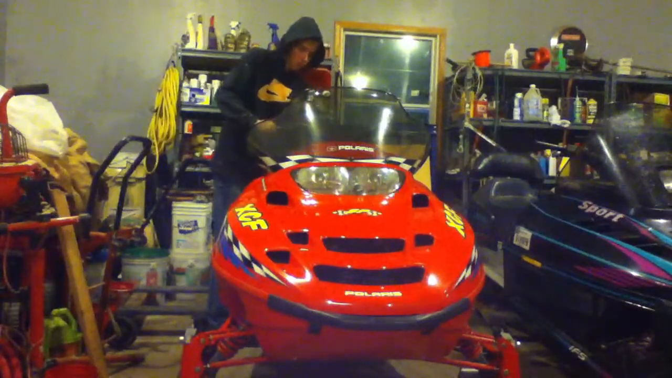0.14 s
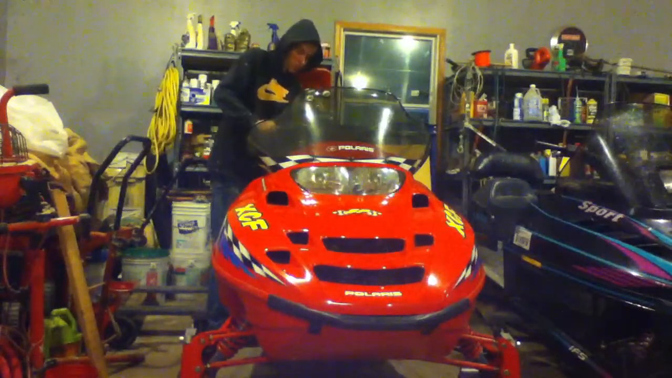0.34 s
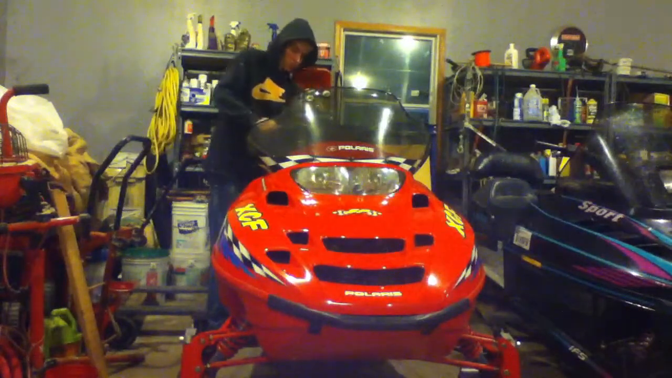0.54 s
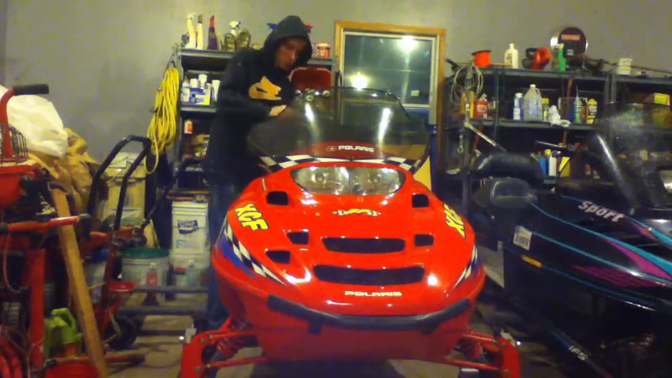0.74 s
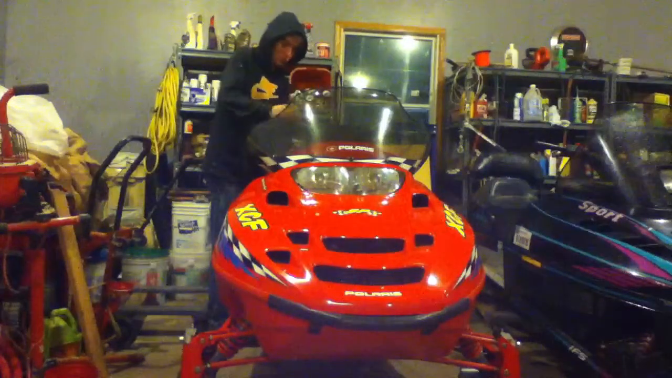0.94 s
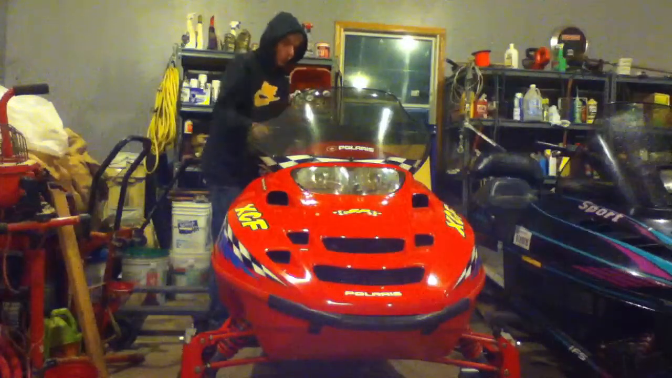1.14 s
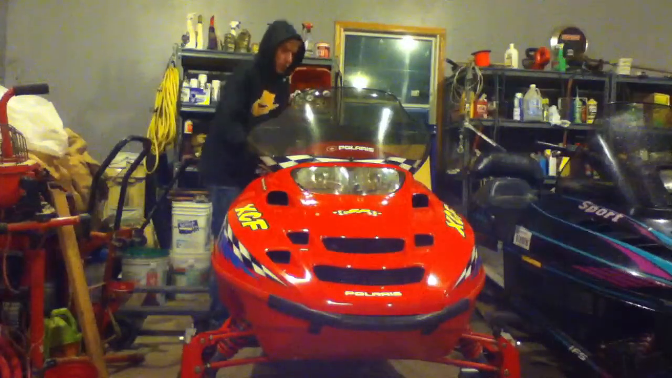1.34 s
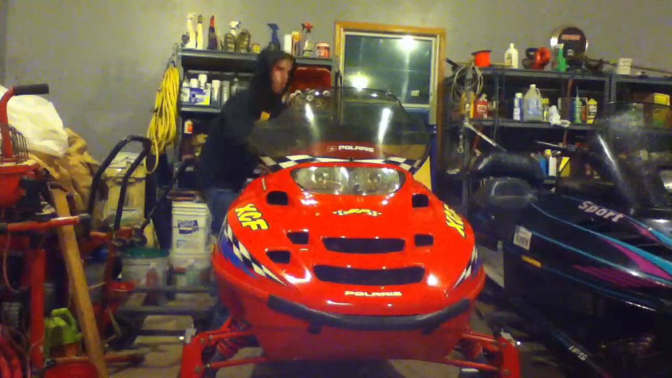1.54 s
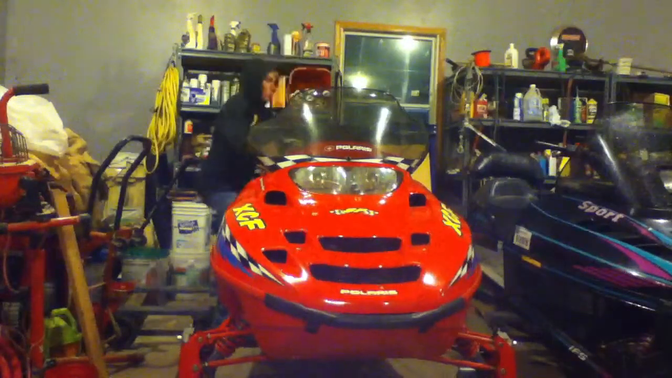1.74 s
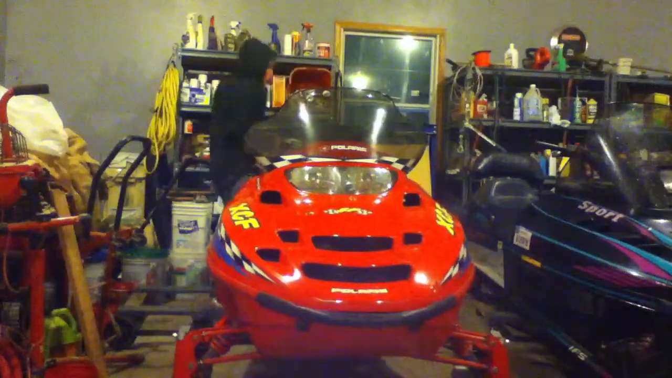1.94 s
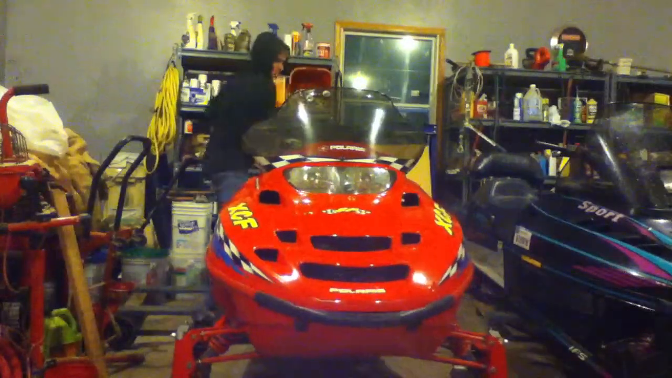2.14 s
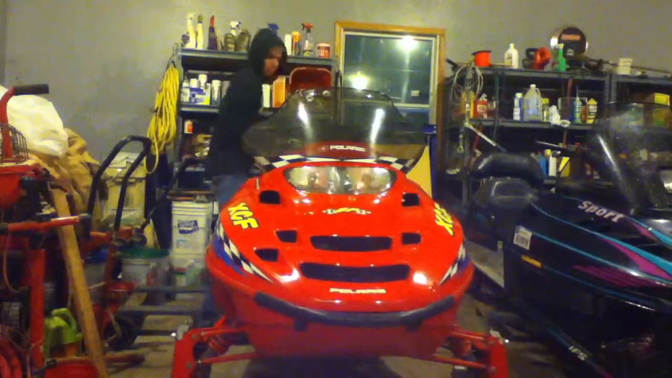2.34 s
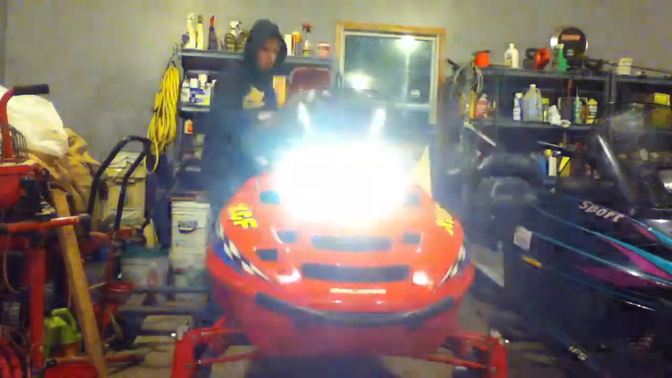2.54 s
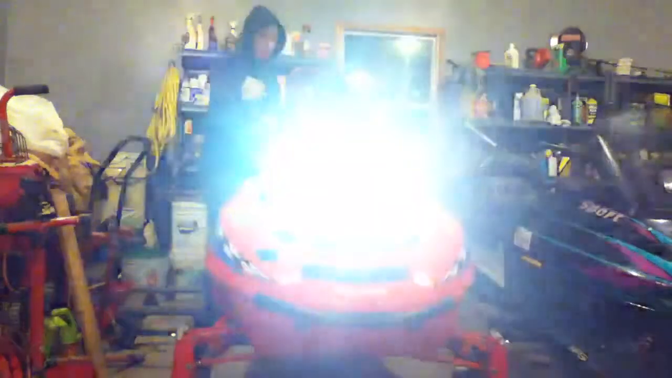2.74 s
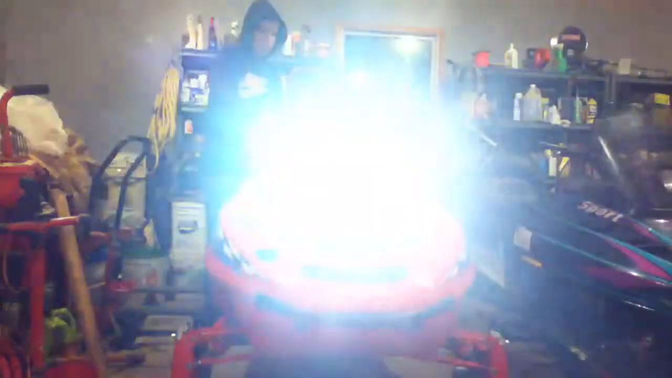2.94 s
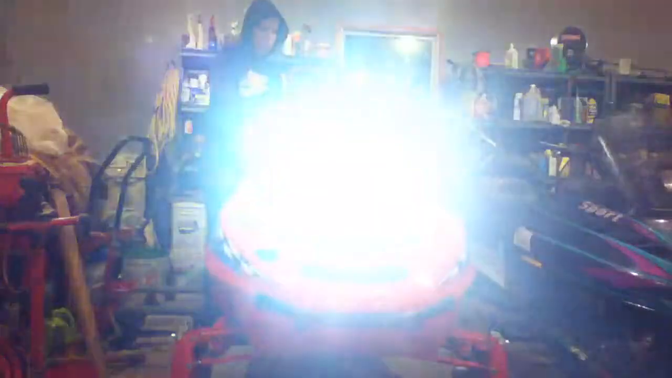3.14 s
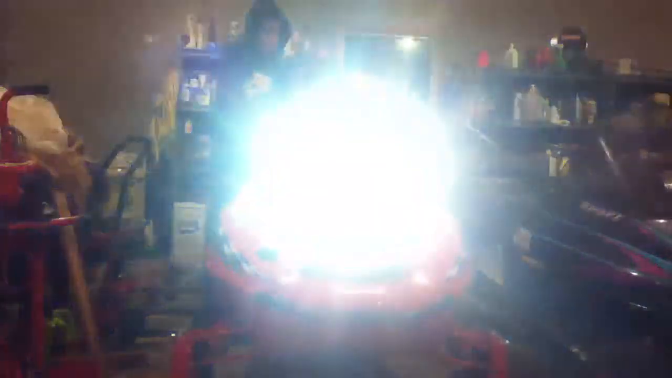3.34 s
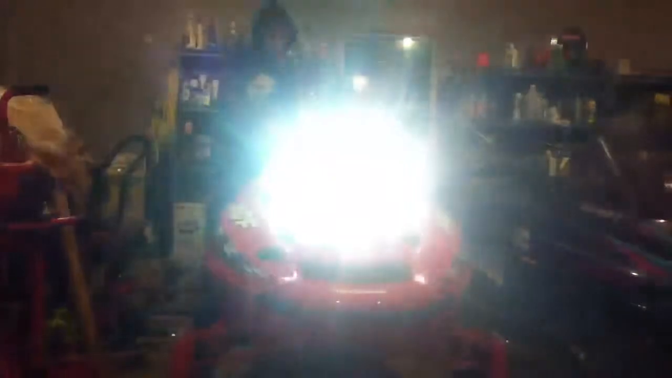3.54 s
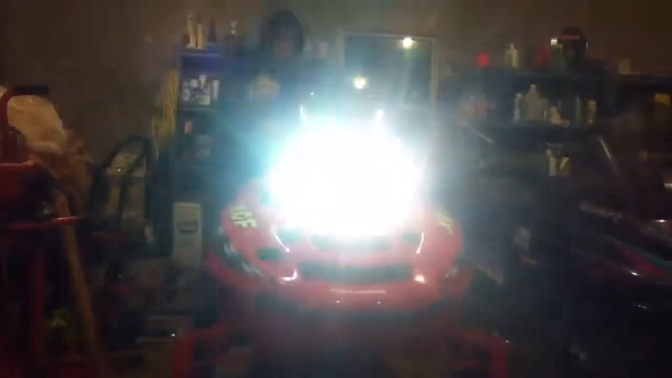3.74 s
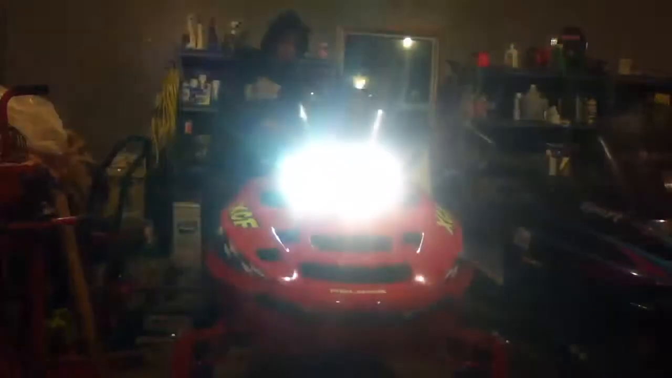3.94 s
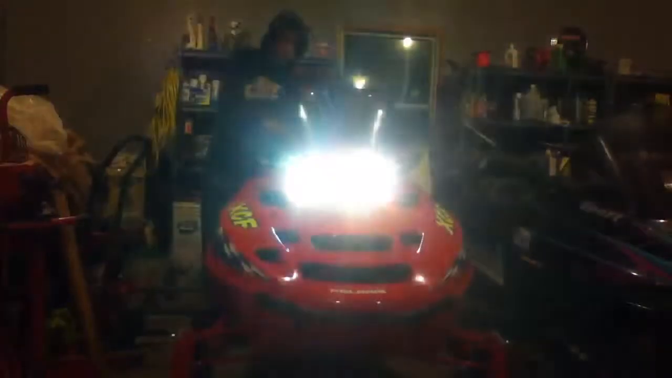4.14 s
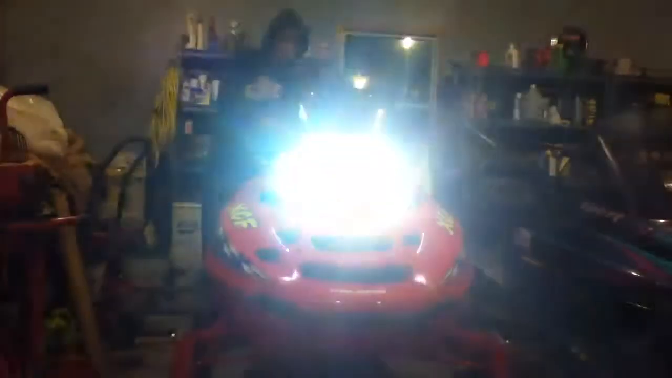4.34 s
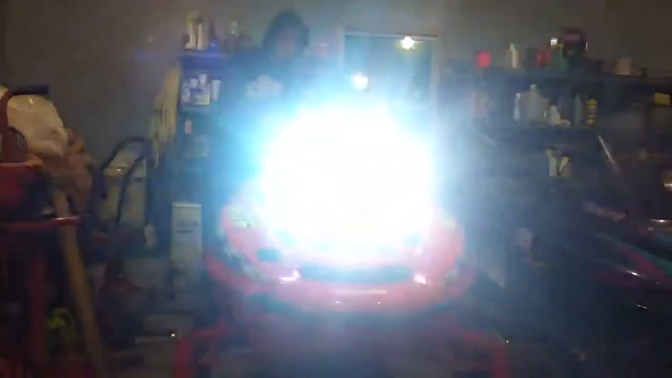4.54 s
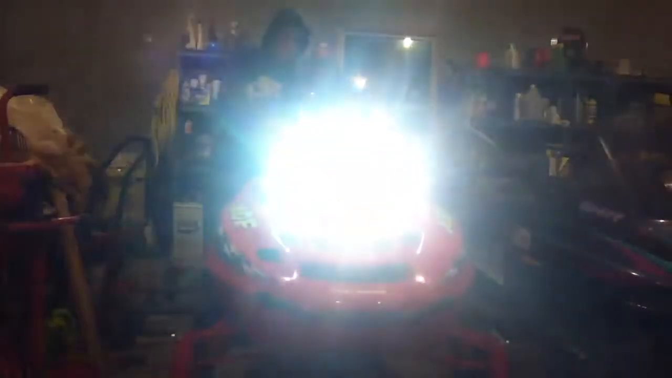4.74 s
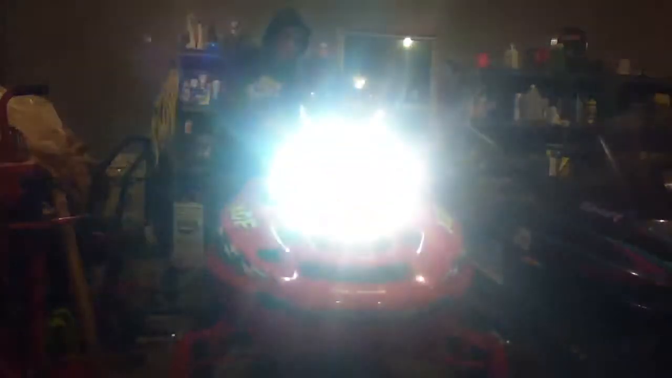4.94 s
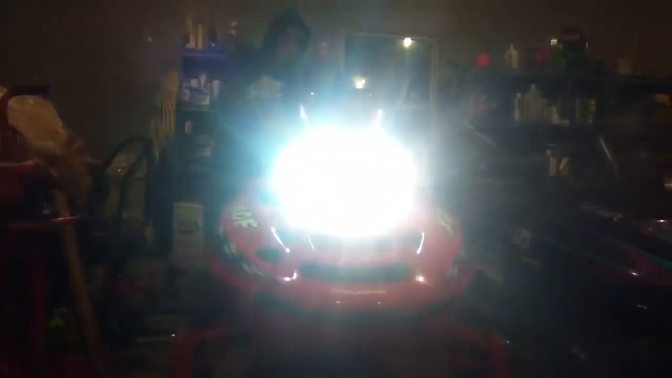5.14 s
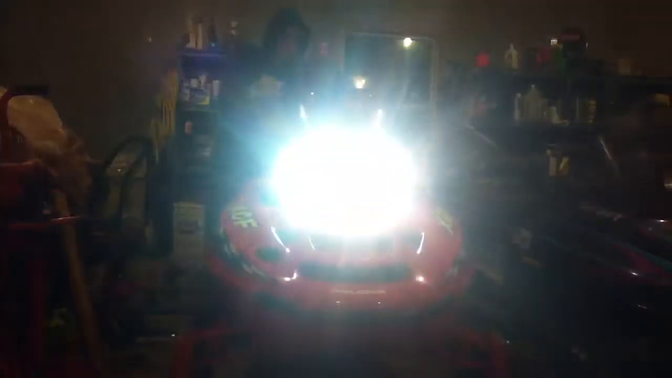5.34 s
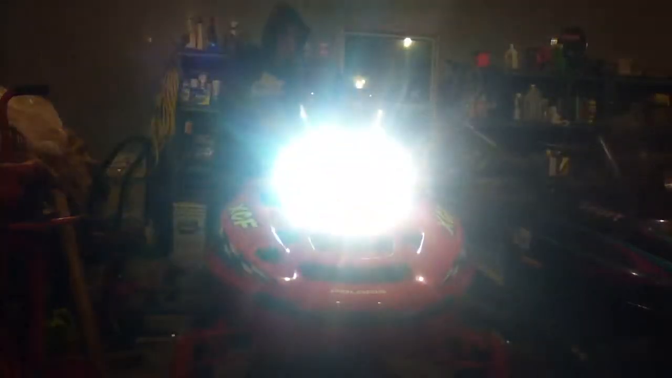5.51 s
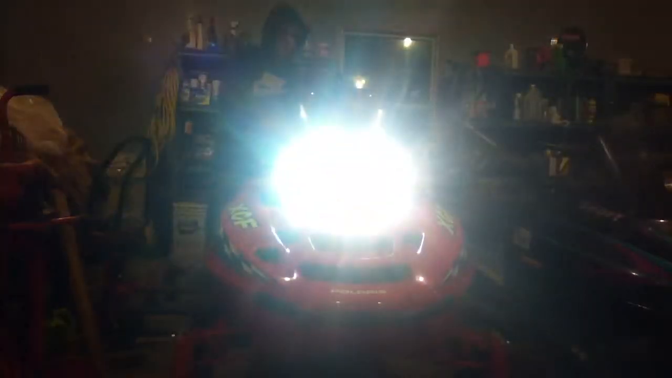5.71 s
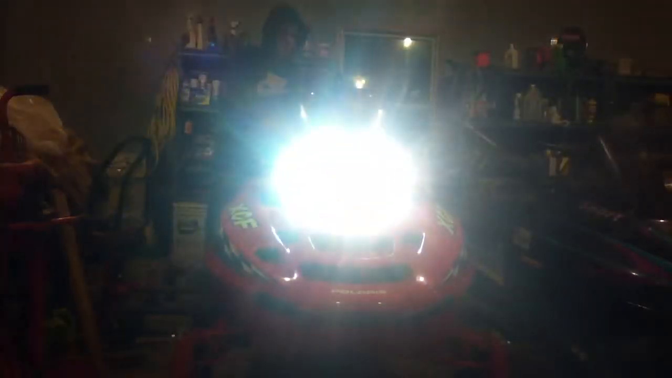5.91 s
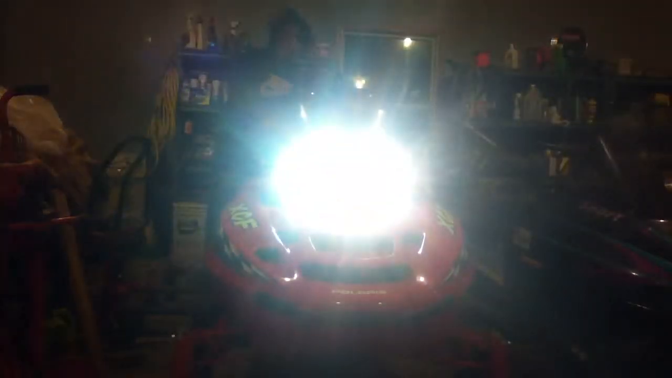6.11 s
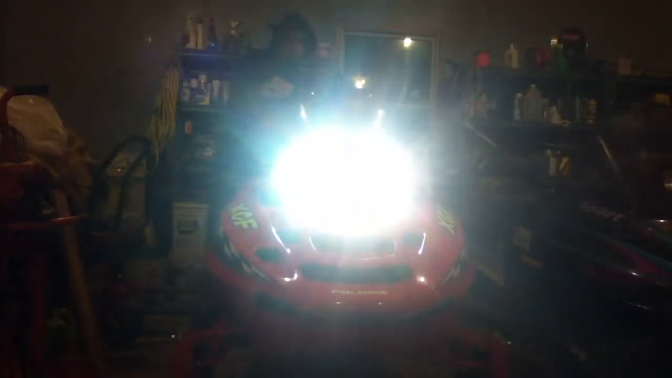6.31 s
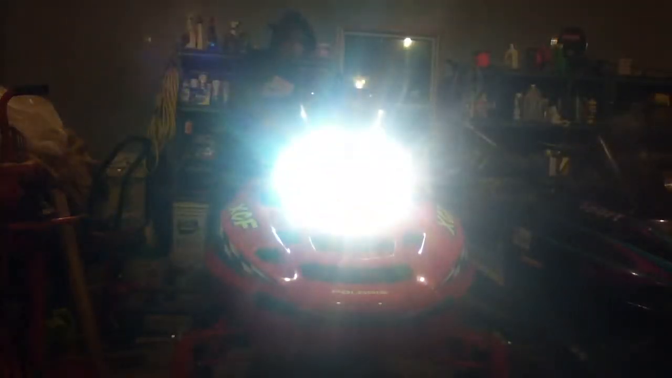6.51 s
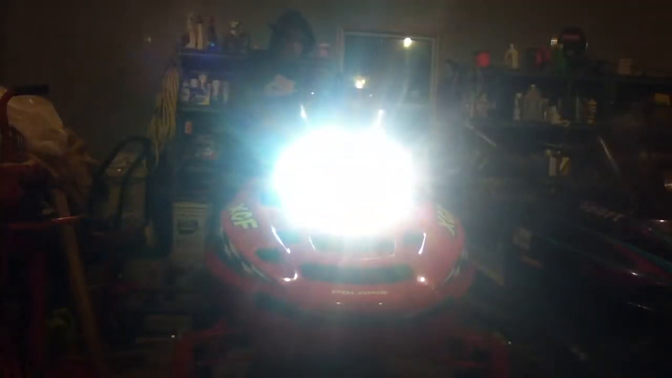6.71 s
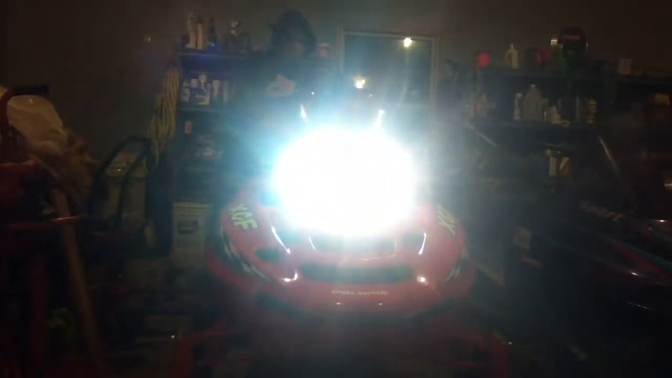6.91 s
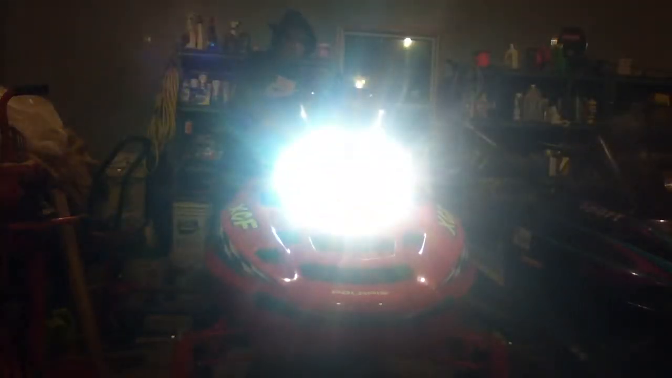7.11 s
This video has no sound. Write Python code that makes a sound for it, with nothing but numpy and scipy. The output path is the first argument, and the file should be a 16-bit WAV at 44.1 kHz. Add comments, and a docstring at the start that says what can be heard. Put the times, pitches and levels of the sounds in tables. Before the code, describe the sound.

Low room tone with soft dull knocks and a small switch click, then a sudden starter pull: clack, thin squeak, metallic clang. The cold twin-cylinder snowmobile engine barks and booms, falters for two seconds, sags near stalling, then surges to a fast buzzing drone full of irregular exhaust cracks. Close indoor pickup in a reverberant garage, the loudest peaks slightly squashed, still running at the end.

```python
"""A few knocks and a switch click in a garage, then a rope pull spins a cold two-stroke twin snowmobile.
It catches, the starter snaps back with a clang; it nearly stalls, then revs up, uneven and popping.
Engine: crank-timed firings drive muffler, airbox and pipe resonances, gas-jet noise and piston slaps.
Pops, starter, switch and knocks: timed clicks become noise puffs with reflections, or ringing modes.
Rope: sagging sines. Background: coloured noise and a faint steady whine."""
import sys
import numpy as np
from scipy import signal
from scipy.fft import rfft, irfft
from scipy.io import wavfile
from scipy.ndimage import uniform_filter1d

SR = 44100
rng = np.random.default_rng(int(sys.argv[2]) if len(sys.argv) > 2 else 0)


def output_pcm(signal):
    """Save a mono or channel-first signal as 16-bit PCM at the path in sys.argv[1].

    Samples are clipped to [-1, 1] before scaling.
    """
    pcm = np.clip(np.atleast_2d(signal).T, -1, 1) * 32767
    wavfile.write(sys.argv[1], SR, np.round(pcm).astype(np.int16))


N = 316197

# crankshaft speed: (time [s], speed [turns/s])
CRANK_SPEED = [(1.7, 12.3), (2.08, 32.6), (2.35, 42.3), (2.64, 44.4), (2.89, 44), (3.17, 53.4),
               (3.85, 47.3), (4.08, 36.8), (4.4, 49.8), (4.55, 72), (4.75, 87), (5.15, 81.5), (5.33, 75),
               (5.66, 95.5), (6.25, 91), (6.64, 88.5), (6.9, 105.4), (7.17, 96)]
# strength of burn re steady running; catches, falters, nearly dies, recovers: (time [s], level [dB])
BURN_STRENGTH = [(2.08, -9.5), (2.14, -1.5), (2.56, 1), (2.62, -6), (2.72, 0.5), (2.82, -6), (3.17, 2.5),
                 (3.28, -5), (3.51, 0.5), (3.6, -5.5), (3.75, -2), (4.18, -14), (4.36, 2), (4.72, -1.5),
                 (5.22, -2.5), (5.6, 1.5), (5.86, -1), (7.17, 0)]
# intake level: (time [s], level [dB])
INTAKE_LEVEL = [(1.9, -32), (1.93, -38), (2.46, -26), (2.6, -30.5), (3.85, -27.5), (4.19, -36.5),
                (4.36, -27.5), (5.01, -20), (5.35, -24), (6.64, -21.5), (7.01, -25), (7.17, -22.5)]
# part loudness: (level at full burn and RUNNING_TURNS_PER_S [dB], slope [dB/octave of speed],
# share of burn swing [1])
BARK_LAW = (-20, 1.2, 0.99)
HONK_LAW = (-27, 0, 0.88)
RASP_LAW = (-22.5, 2.76, 0.49)
CLATTER_LAW = (-27.5, 3.6, .8)
# pipe resonances: (frequency [Hz], width [Hz], level [dB])
PIPE_RESONANCES = [(418.5, 14.8, -2), (464.2, 52, 0.5), (715, 175, -14), (896, 118, -5), (1042, 110, -7)]
# tailpipe resonance: (frequency [Hz], width [Hz], level [dB])
TAILPIPE_RESONANCE = [(580.4, 45, 0)]
PULL_S, SPIN_UP_S, SPIN_UP_POWER = 1.658, 0.23, 1.67
POP_BARK_DB = -11   # pipe ring re the crack level in POP_EVENTS


def engine(tail):
    """Most parts follow crank speed and burn; intake level, honk bursts and pops have their own timing."""
    t = np.arange(N) / SR
    speed, = in_time(CRANK_SPEED)
    burn_db, = in_time(BURN_STRENGTH)
    intake_db, = in_time(INTAKE_LEVEL)
    turns = np.cumsum(speed) / SR
    pop_s, crack_db, _, pop_boom_db = np.transpose(POP_EVENTS)
    blows = firings(turns, uneven_db=4, jitter_s=0.00015)   # one blow-down per firing

    intake_sound = intake(turns, speed, rough_db=-2)
    bark = pipe(blows, turns, PIPE_RESONANCES, clean_db=-3)
    honk = pipe(blows, turns, TAILPIPE_RESONANCE, clean_db=-2)
    spitting = from_db(-4) * spits(turns, share=0.45, spread_db=10)

    # each pop also sets the muffler and the pipe sounding
    running_boom = muffler_gain(speed, burn_db) * surge(depth_db=2, rate_hz=11)
    pop_boom = swell(pop_s, pop_boom_db, attack_s=0.0072, decay_s=0.052)
    boom_gain = np.hypot(running_boom, pop_boom)
    pop_bark = swell(pop_s, crack_db + POP_BARK_DB, attack_s=0.0019, decay_s=0.038)
    bark_gain = np.hypot(part_gain(BARK_LAW, speed, burn_db), pop_bark)
    honk_gain = np.hypot(part_gain(HONK_LAW, speed, burn_db), honk_bursts())
    rasp_gain = part_gain(RASP_LAW, speed, burn_db)
    clatter_gain = part_gain(CLATTER_LAW, speed, burn_db) * surge(depth_db=1.7, rate_hz=18)

    sound = boom_gain * muffler(turns, speed, tail, rough_db=-1)
    sound += bark_gain * surge(depth_db=1, rate_hz=9) * bark
    sound += honk_gain * honk
    sound += from_db(intake_db) * intake_sound
    sound += rasp_gain * (rasp(blows, shell_db=-8.5) + spitting)
    sound += clatter_gain * clatter(turns)
    return sound * np.clip((t - PULL_S) / SPIN_UP_S, 0, 1) ** SPIN_UP_POWER


# mean strength of four successive firings over two turns: (level [dB])
FIRING_STRENGTH = [-0.5, -1, -2, -7]


def firings(turns, uneven_db, jitter_s):
    """Two firings a turn; every fourth is weaker on average, and level and timing vary by chance."""
    at = np.flatnonzero(np.diff(np.floor(2 * turns)) > 0)
    chance = rng.standard_normal((len(at), 2))
    level_db = np.resize(FIRING_STRENGTH, len(at)) + uneven_db * chance[:, 1]
    return strikes(at / SR + jitter_s * chance[:, 0], level_db)


RUNNING_TURNS_PER_S = 95


def part_gain(law, speed, burn_db):
    """A part grows louder with burn strength and, where its slope is positive, with speed."""
    level_db, db_per_octave, share = law
    octaves = np.log2(speed / RUNNING_TURNS_PER_S)
    return from_db(level_db + db_per_octave * octaves + share * burn_db)


def surge(depth_db, rate_hz):
    """The level wanders as good and poor burns come in runs."""
    return from_db(depth_db * np.clip(waver(rate_hz), -2, 2))


def swell(times, db, attack_s, decay_s):
    """Each blow raises a level that builds quickly and dies away; overlaps add in power."""
    t = np.arange(SR) / SR
    shape = (1 - np.exp(-t / attack_s)) * np.exp(-t / decay_s)
    return np.sqrt(np.abs(through(strikes(times, db) ** 2, shape ** 2)))


# muffler resonances: (frequency [Hz], width [Hz], level [dB])
MUFFLER_RESONANCES = [(86.6, 11.7, 6.5), (118.7, 33.5, 1.5)]


def muffler(turns, speed, tail, rough_db):
    """Orders 1-3 of the crank excite the muffler, fading in with speed; uneven burns add rumble."""
    orders = np.sin(2 * np.pi * turns)
    orders += from_db(1) * np.sin(4 * np.pi * turns)
    orders += from_db(-7) * np.sin(6 * np.pi * turns)
    hum = evened(band(resonate(orders, MUFFLER_RESONANCES), 70, 148, order=4))
    hum *= np.interp(speed, [22, 32], [0, 1])
    uneven = firings(turns, uneven_db=8, jitter_s=0.0013)
    rumble = in_garage(resonate(uneven, MUFFLER_RESONANCES), tail, wet_db=2)
    rumble = evened(band(rumble, 67.7, 196, order=4))
    return evened(hum + from_db(rough_db) * rumble)


BOOM_TURNS_PER_S, BOOM_DB, BOOM_FOLLOWS_BURN = 39, -20.5, 0.41
BOOM_LOSS_DB_PER_OCTAVE, BOOM_DETUNE_DB_PER_OCTAVE = 4.5, 7


def muffler_gain(speed, burn_db):
    """Boom follows the burn, peaks at BOOM_TURNS_PER_S, and is favoured at whole octaves from it."""
    octaves = np.log2(speed / BOOM_TURNS_PER_S)
    detune = np.minimum(np.abs(octaves - np.round(octaves)), 0.3)
    loss_db = BOOM_LOSS_DB_PER_OCTAVE * np.abs(octaves) + BOOM_DETUNE_DB_PER_OCTAVE * detune
    return from_db(BOOM_DB - loss_db + BOOM_FOLLOWS_BURN * burn_db)


def pipe(blows, turns, resonances, clean_db):
    """Blow-downs and turbulent gas ring sharp exhaust resonances, over orders that swell and fade."""
    turbulence = bursts_in_garage(blows, decay_s=0.0046, wet_db=3.5, t60_s=0.39)
    gas = rms_one(turbulence) + from_db(-8.5) * rms_one(blows)
    orders = half_orders(turns, first=8, count=24)
    drive = evened(band(gas, 397, 880)) + from_db(clean_db) * evened(band(orders, 283, 1150))
    sound = 0
    for hz, width_hz, db in resonances:
        # two passes keep the valleys between resonances dark
        once = resonate(drive, [(hz, width_hz, db)])
        sound = sound + resonate(once, [(hz, width_hz, 0)])
    return evened(sound)


# tailpipe honks as the burn takes hold: (time [s], length [s], level [dB])
HONK_EVENTS = [(2.108, 0.03, -18.5), (2.19, 0.058, -17.5), (2.54, 0.031, -20.5), (2.945, 0.032, -18.5),
               (3.165, 0.077, -22.5), (3.39, 0.12, -22), (3.697, 0.041, -21), (4.192, 0.23, -25),
               (4.516, 0.2, -35), (6.905, .04, -29), (7.1, 0.042, -21)]
HONK_ATTACK_S, HONK_RELEASE_S = 0.0076, 0.018


def honk_bursts():
    """Gain of the tailpipe honks: each rises quickly, holds and dies away."""
    t = np.arange(N) / SR
    gain = 0
    for s, length_s, db in HONK_EVENTS:
        rise = np.clip((t - s) / HONK_ATTACK_S, 0, 1)
        fall = np.exp(-np.maximum(t - s - length_s, 0) / HONK_RELEASE_S)
        gain = gain + from_db(db) * rise * fall
    return gain


# airbox resonances: (frequency [Hz], width [Hz], level [dB])
AIRBOX_RESONANCES = [(154, 49, -3), (214.1, 24, 3.5), (293, 24.86, 4.5), (327, 74, -2.5)]


def intake(turns, speed, rough_db):
    """The airbox flutters at low speed; at high speed whole and half orders stand out as a drone."""
    orders = half_orders(turns, first=3, count=6)
    drone = evened(resonate(orders, AIRBOX_RESONANCES))
    drone *= from_db(np.interp(speed, [55, 78], [-14, 0]))
    gulps = firings(turns, uneven_db=2.5, jitter_s=0.00018)
    air = bursts_in_garage(gulps, decay_s=0.0093, wet_db=1, t60_s=0.34)
    flutter = coloured(air, [(110, -24.5), (160, -7.5), (218, 9.5), (265, 4), (330, 5),
                             (400, 3.5), (520, -33.5)])
    return evened(drone + from_db(rough_db) * evened(flutter))


def half_orders(turns, first, count):
    """Lines at multiples of half the crank speed, swelling and fading as the burn pattern shifts."""
    lines = 0
    for k in range(first, first + count):
        gain = from_db(4.5 * waver(2))
        lines = lines + gain * np.sin(np.pi * k * turns + rng.uniform(0, 2 * np.pi))
    return lines


# gas-jet spectrum: (frequency [Hz], density [dB/Hz])
RASP_SPECTRUM = [(500, -13.5), (750, 3.5), (1050, 1.5), (1220, 1), (1350, 3), (1550, 1.5), (1900, 2),
                 (2230, -4.5), (2520, -1.5), (2870, 0), (3150, -4), (5000, -19.5), (9000, -59)]
# pipe shell resonances: (frequency [Hz], width [Hz], level [dB])
SHELL_RESONANCES = [(1335, 13, 0.4), (1697, 3.3, 8.5), (2106, 19, 6), (2655, 40, -4.5)]


def rasp(blows, shell_db):
    """The gas jet tears at every firing and buzzes the pipe's steel shell."""
    jet = coloured(bursts_in_garage(blows, decay_s=0.0042, wet_db=11.5, t60_s=0.65), RASP_SPECTRUM)
    shell = resonate(jet, SHELL_RESONANCES)
    return evened(rms_one(jet) + from_db(shell_db) * rms_one(shell))


# slap spectrum: (frequency [Hz], density [dB/Hz])
CLATTER_SPECTRUM = [(1500, -35), (2800, -2.5), (3500, 0.5), (4400, 2), (6300, 0.5), (8000, -5.5),
                    (10000, -7.5), (12000, -14.5), (14000, -45), (16000, -47)]


def clatter(turns):
    """Pistons and clutch slap once a turn, on average harder on alternate turns."""
    at = np.flatnonzero(np.diff(np.floor(turns)) > 0)
    level_db = np.resize([0, -1.5], len(at)) + 2 * rng.standard_normal(len(at))
    slaps = strikes(at / SR, level_db)
    noise = bursts_in_garage(slaps, decay_s=0.0088, wet_db=3.5, t60_s=0.93)
    return evened(coloured(noise, CLATTER_SPECTRUM))


# crack spectrum, also used by pops: (frequency [Hz], density [dB/Hz])
CRACK_SPECTRUM = [(200, -20), (470, 6.5), (900, -4), (1600, -6), (1950, -3.5), (2250, 5), (2550, -4.5),
                  (2850, 3.5), (3300, -21), (8000, -40.5), (15000, -35)]


def spits(turns, share, spread_db):
    """A share of the turns each spit one small crack of random size."""
    at = np.flatnonzero(np.diff(np.floor(turns)) > 0)
    chance = rng.random((len(at), 2))
    spat = chance[:, 0] < share
    cracks = strikes(at[spat] / SR, spread_db * chance[spat, 1])
    noise = bursts_in_garage(cracks, decay_s=0.0049, wet_db=-0.5, t60_s=1)
    return rms_one(coloured(noise, CRACK_SPECTRUM))


# late charges popping in the pipe, relative levels:
# (time [s], crack level [dB], sizzle level [dB], boom level [dB])
POP_EVENTS = [(2.22, -14, -31, -17), (2.287, -6.5, -22, -18), (2.3347, -5, -26, -15),
              (2.4752, -11, -25, -14.5), (2.5181, -6.5, -23, -18), (2.6972, -5.5, -22, -17),
              (2.8704, -9.5, -28, -18), (2.9125, -8, -29, -22), (2.9527, -11.5, -34, -29),
              (3.0298, -12, -39, -32), (3.1038, -6.5, -24.5, -34), (3.14, -7.5, -28, -17),
              (3.2044, -34, -28.5, -18), (3.2743, -31, -25, -30), (3.3458, -14, -25, -34),
              (3.458, -9, -25, -22), (3.711, -8, -24.5, -13), (3.87, -26, -50, -14), (3.94, -18, -46, -19),
              (4.2506, -12.5, -23.5, -14), (4.3118, -23, -25, -15.5), (4.338, -7, -23, -27),
              (4.3893, -6.5, -23.5, -13), (4.43, -6, -25, -18), (4.565, -8, -32, -26),
              (4.6168, -7.5, -25, -30), (4.642, -6, -30, -19), (4.8868, -5.5, -23, -23),
              (5.295, -7, -23, -37), (5.3522, -9, -22.5, -36), (5.4032, -5, -21, -35),
              (5.451, -7, -20.5, -33), (5.709, -8, -23, -17), (5.912, -10.5, -26, -24),
              (6.0199, -8, -22.5, -33), (6.129, -7, -25, -20), (6.246, -6, -22, -18),
              (6.3763, -8, -20, -16), (6.4923, -9, -24, -21), (6.586, -7, -22, -28),
              (6.6446, -6.5, -26, -22), (6.8519, -6.5, -23, -30), (6.912, -3.5, -25, -25),
              (7.1005, -7, -20, -18)]
# sizzle spectrum: (frequency [Hz], density [dB/Hz])
SIZZLE_SPECTRUM = [(1500, -25), (2800, 4), (4400, 3.5), (6300, -0.5), (9000, -2.5), (12000, -9.5),
                   (14000, -10), (16000, -30)]


def pops(crack_db, sizzle_db):
    """Unburnt fuel goes off in the pipe with a sharp crack and a short sizzle."""
    s, crack_level_db, sizzle_level_db, _ = np.transpose(POP_EVENTS)
    cracks = strikes(s, crack_level_db + crack_db)
    crack = bursts_in_garage(cracks, decay_s=0.0058, wet_db=-1.5, t60_s=0.29)
    sizzles = strikes(s, sizzle_level_db + sizzle_db)
    sizzle = bursts_in_garage(sizzles, decay_s=0.016, wet_db=-6, t60_s=0.5)
    return coloured(crack, CRACK_SPECTRUM) + coloured(sizzle, SIZZLE_SPECTRUM)


# starter impacts, relative levels: (time [s], clack level [dB], clang level [dB])
STARTER_EVENTS = [(1.853, -22.5, -60), (1.863, -14, -44), (2.114, -23.5, -61), (2.147, -35, -26.5),
                  (2.174, -30, -18.5), (2.193, -17, -19.5)]
# starter cup modes: (frequency [Hz], level [dB], t60 [s])
STARTER_MODES = [(3101, 0, 0.52), (3180, -7, .22), (4240, -4, 0.19), (4926, -3, 0.48), (5010, -8, 0.38),
                 (6640, -8, 0.14), (7640, -8, .15), (7700, -6, 0.1), (8850, -10, 0.14), (11440, -10, 0.12),
                 (12360, -17, .2), (13520, -18, .12)]
# clack spectrum: (frequency [Hz], density [dB/Hz])
CLACK_SPECTRUM = [(200, -2), (700, 5), (1200, 7), (2000, -0.5), (4000, -1.5), (8000, -7.5), (12000, -21),
                  (15500, -50)]


def starter(tail, clack_db, ring_db, rattle_db):
    """The rope hits its end, then recoils: the steel cup clangs and its pawls rattle brightly."""
    s, clack_level_db, clang_level_db = np.transpose(STARTER_EVENTS)
    clacks = strikes(s, clack_level_db + clack_db)
    clack = bursts_in_garage(clacks, decay_s=0.0057, wet_db=1.5, t60_s=0.6)
    clang = ring(strikes(s, clang_level_db + ring_db), STARTER_MODES)
    rattles = strikes(s, clang_level_db + rattle_db)
    rattle = bursts_in_garage(rattles, decay_s=0.015, wet_db=-6, t60_s=0.35)
    rattle = coloured(rattle, [(2000, -18), (3100, -5), (5500, -3), (7700, 11), (8400, -2),
                               (12500, 0), (13700, -9), (14500, -24)])
    return coloured(clack, CLACK_SPECTRUM) + in_garage(clang, tail, wet_db=-3) + rattle


# rope squeaking through its guide: (time [s], starting pitch [Hz], level [dB])
SQUEAK_EVENTS = [(1.675, 1470, -46.5), (1.849, 1205, -24)]
SQUEAK_ATTACK_S, SQUEAK_T60_S, SQUEAK_SAG_HZ_PER_S = 0.0093, 0.92, 306


def rope():
    """Thin, unsteady squeaks that sag in pitch as the rope runs out."""
    flutter = 0.7 + 0.7 * rms_one(band(rng.standard_normal(N), 1, 50))
    sound = 0
    for s, hz, db in SQUEAK_EVENTS:
        t = np.maximum(np.arange(N) / SR - s, 0)
        decay = np.exp(-np.log(1000) * t / SQUEAK_T60_S)
        level = np.minimum(t / SQUEAK_ATTACK_S, 1) * from_db(db) * decay
        cycles = np.cumsum(hz - SQUEAK_SAG_HZ_PER_S * t) / SR
        sound = sound + level * np.sin(2 * np.pi * cycles)
    return flutter * sound


# switch clicks, relative levels: (time [s], snap level [dB], upper cutoff [Hz], ping level [dB])
SWITCH_EVENTS = [(0.9475, -36, 6000, -62), (0.974, -33, 14000, -37)]
# click spectrum: (frequency [Hz], density [dB/Hz])
CLICK_SPECTRUM = [(300, 6), (1000, -1), (2500, 3), (3700, 3), (5000, 2), (9000, -1), (12000, -10),
                  (15500, -18)]
# switch spring modes: (frequency [Hz], level [dB], t60 [s])
SPRING_MODES = [(4945, -5, 0.61), (4900, -13, .45), (7160, -14, .5), (7260, -10, 0.41), (10140, -20, .45)]
# dash thuds, relative levels: (time [s], level [dB])
THUD_EVENTS = [(0.976, -30), (1.004, -36)]
# dash resonances: (frequency [Hz], width [Hz], level [dB])
DASH_RESONANCES = [(204, 28, -8), (448, 28, 1.5), (580, 64, -6.5), (643, 91, -6.5)]


def switch(snap_db, thud_db, ping_db):
    """A switch ticks, then snaps home: its spring pings and the hollow dash thuds."""
    sound = 0
    for s, db, cutoff_hz, _ in SWITCH_EVENTS:
        snap = bursts_in_garage(strikes([s], db + snap_db), decay_s=0.016, wet_db=-3.5, t60_s=0.89)
        sound = sound + band(coloured(snap, CLICK_SPECTRUM), 200, cutoff_hz)
    s, _, _, spring_db = np.transpose(SWITCH_EVENTS)
    sound += ring(strikes(s, spring_db + ping_db), SPRING_MODES)
    s, db = np.transpose(THUD_EVENTS)
    thud = bursts_in_garage(strikes(s, db + thud_db), decay_s=0.012, wet_db=5.5, t60_s=0.81)
    return sound + resonate(thud, DASH_RESONANCES)


# hands on the controls, relative levels: (time [s], knock level [dB], tick level [dB])
KNOCK_EVENTS = [(0.004, -44.5, -44), (0.356, -44.5, -52), (0.683, -33, -46), (0.762, -35, -60),
                (0.789, -39.5, -58), (0.849, -39, -55)]
# dull knock spectrum: (frequency [Hz], density [dB/Hz])
KNOCK_SPECTRUM = [(60, -24), (130, -4), (230, 0), (540, -2.5), (850, -8.5), (1080, -8), (1500, -21),
                  (1800, -16), (2600, -28), (12000, -41)]


def knocks(knock_db, tick_db):
    """Hands bump the dash and handlebar, mostly heard by way of the walls."""
    s, knock_level_db, tick_level_db = np.transpose(KNOCK_EVENTS)
    dull = bursts_in_garage(strikes(s, knock_level_db + knock_db), decay_s=0.021, wet_db=7, t60_s=0.8)
    tick = bursts_in_garage(strikes(s, tick_level_db + tick_db), decay_s=0.015, wet_db=7.5, t60_s=0.71)
    tick = coloured(tick, [(500, -13), (1400, 3), (3000, -11), (10000, -31)])
    return coloured(dull, KNOCK_SPECTRUM) + tick


# background spectrum: (frequency [Hz], density [dB/Hz])
AIR_SPECTRUM = [(15, -40), (25, -12), (53, 3), (69, -1), (101, 4.5), (119, 5), (2010, -11), (3440, -13),
                (5880, -13), (12200, -16), (15500, -26)]
AIR_DB = -57


def room_air():
    """Steady coloured noise under everything."""
    return from_db(AIR_DB) * coloured(rng.standard_normal(N), AIR_SPECTRUM)


WHINE_HZ, WHINE_RMS_DB = 14992, -78


def whine():
    """A faint, steady electrical whine: one sine."""
    return from_db(WHINE_RMS_DB) * np.sqrt(2) * np.sin(2 * np.pi * WHINE_HZ * np.arange(N) / SR)


# garage reverberation: (frequency [Hz], t60 [s])
GARAGE_DECAY = [(100, 0.38), (450, 0.74), (1500, 0.22), (5000, 0.62), (14000, 0.1)]


def garage_tail():
    """Diffuse reflections, each noise band dying at its own rate; unit energy."""
    t = np.arange(SR) / SR
    edges_hz = np.geomspace(40, 20000, 10)
    tail = 0
    for low_hz, high_hz in zip(edges_hz, edges_hz[1:]):
        t60_s = at_hz(GARAGE_DECAY, np.sqrt(low_hz * high_hz))
        tail = tail + band(rng.standard_normal(SR), low_hz, high_hz) * from_db(-60 * t / t60_s)
    tail *= 1 - np.exp(-t / 0.0014)
    return tail / np.linalg.norm(tail)


def in_garage(x, tail, wet_db):
    """Direct sound plus reflections."""
    return x + from_db(wet_db) * through(x, tail)


def bursts_in_garage(clicks, decay_s, wet_db, t60_s):
    """Each click lets go a puff of noise, followed by its diffuse reflections."""
    fall = np.exp(-2 / (decay_s * SR))   # power envelopes
    room_fall = np.exp(-np.log(1e6) / (t60_s * SR))
    direct = signal.lfilter([1], [1, -fall], clicks ** 2 + 1e-18)
    reflected = signal.lfilter([1 - room_fall], [1, -room_fall], direct)
    return np.sqrt(direct + from_db(wet_db) ** 2 * reflected) * rng.standard_normal(N)


def strikes(times, db):
    """One click at each time."""
    out = np.zeros(N)
    at = np.clip(np.round(np.asarray(times) * SR).astype(int), 0, N - 1)
    np.add.at(out, at, from_db(db))
    return out


def ring(clicks, modes):
    """Each click sets decaying sines going."""
    t = np.arange(SR) / SR
    response = sum(from_db(db - 60 * t / t60_s) * np.sin(2 * np.pi * hz * t) for hz, db, t60_s in modes)
    return through(clicks, response)


def resonate(x, resonances):
    """Parallel two-pole resonances with alternating signs."""
    out = 0
    for k, (hz, width_hz, db) in enumerate(resonances):
        r = np.exp(-np.pi * width_hz / SR)
        poles = [1, -2 * r * np.cos(2 * np.pi * hz / SR), r * r]
        gain = (-1) ** k * from_db(db) * (1 - r * r) / 2
        out = out + gain * signal.lfilter([1, 0, -1], poles, x + 1e-18)
    return out


def coloured(x, spectrum, size=4096):
    """Causal (minimum-phase) filter with the given spectrum shape and unit energy."""
    magnitude = from_db(at_hz(spectrum, np.linspace(0, SR / 2, size + 1)))
    cepstrum = irfft(np.log(magnitude))
    cepstrum[1:size] *= 2
    cepstrum[size + 1:] = 0
    response = irfft(np.exp(rfft(cepstrum)))
    return through(x, response / np.linalg.norm(response))


def band(x, low_hz, high_hz, order=2):
    """Butterworth band-pass."""
    edges_hz = [low_hz, min(high_hz, SR / 2 - 1)]
    return signal.sosfilt(signal.butter(order, edges_hz, "band", fs=SR, output="sos"), x + 1e-18)


def through(x, response):
    """Pass a sound through an impulse response."""
    return signal.oaconvolve(x, response)[:N]


def waver(rate_hz, size=200):
    """Slow random curve of rms 1."""
    r = np.exp(-2 * np.pi * rate_hz * size / SR)
    slow = signal.lfilter([1], [1, -2 * r, r * r], rng.standard_normal(N // size + 502))
    slow = slow[500:]   # settled part
    return np.interp(np.arange(N) / size, np.arange(len(slow)), rms_one(slow))


def evened(x):
    """Hold the slow level near rms 1, keeping the single beats."""
    power = uniform_filter1d(uniform_filter1d(x ** 2, size=3500), size=3500)
    return x / np.sqrt(np.abs(power) + 1e-4 * np.mean(x ** 2))


def rms_one(x):
    """Scale to rms 1."""
    return x / np.sqrt(np.mean(x ** 2) + 1e-20)


def in_time(rows):
    """Each column of a curve, sample by sample."""
    s, *columns = np.transpose(rows)
    return [np.interp(np.arange(N) / SR, s, c) for c in columns]


def at_hz(points, hz):
    """Read a table on a log-frequency axis."""
    f, value = np.transpose(points)
    return np.interp(np.log(np.maximum(hz, 1)), np.log(f), value)


def from_db(db):
    """Decibels to gain."""
    return 10 ** (np.asarray(db) / 20)


def scene():
    """Sum all sources; both channels are the same."""
    tail = garage_tail()
    running = engine(tail) + pops(crack_db=-6.5, sizzle_db=-1)
    pull = starter(tail, clack_db=0.5, ring_db=-0.5, rattle_db=0) + rope()
    handling = switch(snap_db=0, thud_db=25, ping_db=-1) + knocks(knock_db=-8.5, tick_db=-6)
    sound = running + pull + handling + room_air() + whine()
    return np.array([sound, sound])


CEILING, CUTOFF_HZ = 0.73, 15600   # ceiling in full-scale units


def record(dry):
    """The loudest peaks are rounded off and the top is cut."""
    held = dry / (1 + (dry / CEILING) ** 6) ** (1 / 6)
    return signal.sosfilt(signal.ellip(14, 0.1, 90, CUTOFF_HZ, fs=SR, output="sos"), held)


dry = scene()
out = record(dry)
output_pcm(out)
```